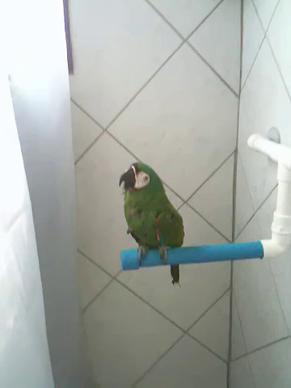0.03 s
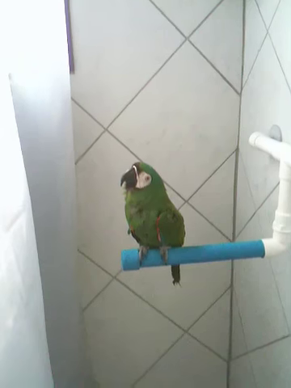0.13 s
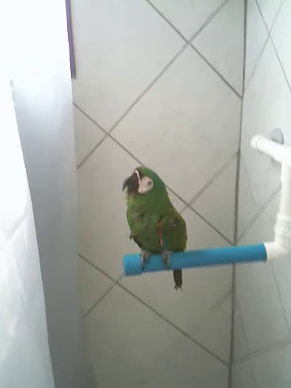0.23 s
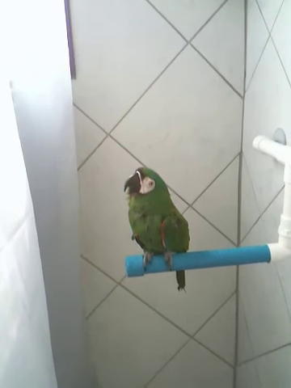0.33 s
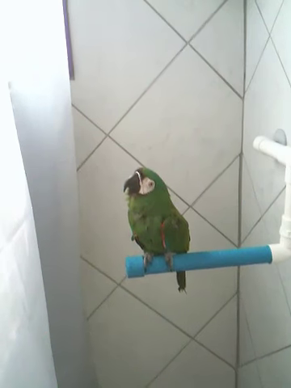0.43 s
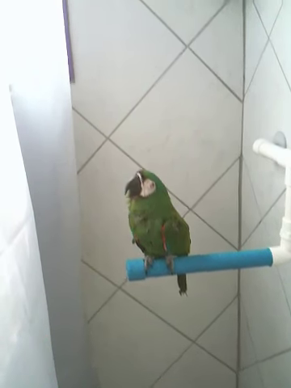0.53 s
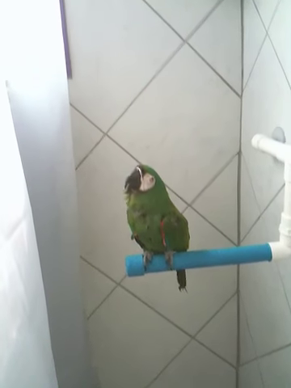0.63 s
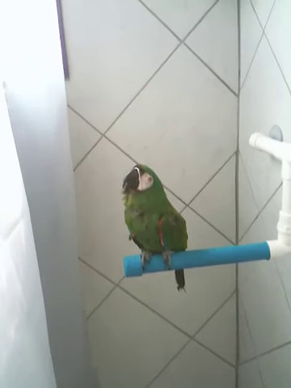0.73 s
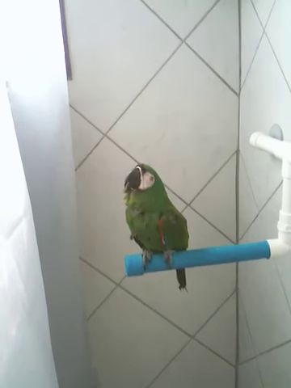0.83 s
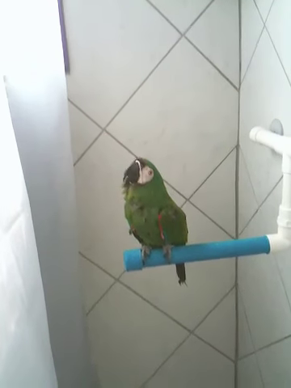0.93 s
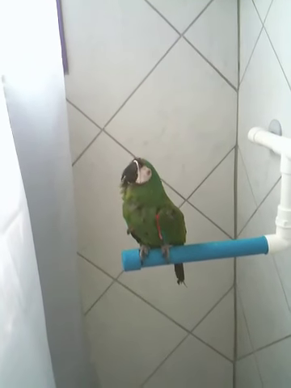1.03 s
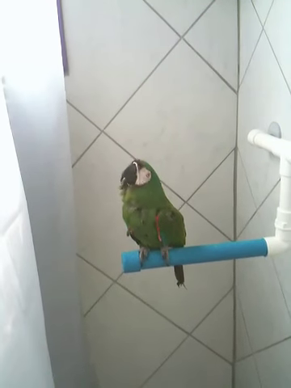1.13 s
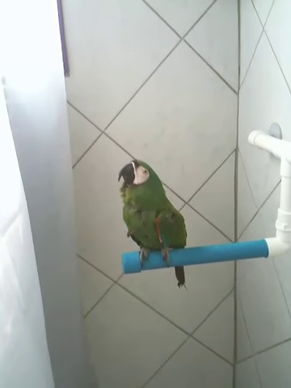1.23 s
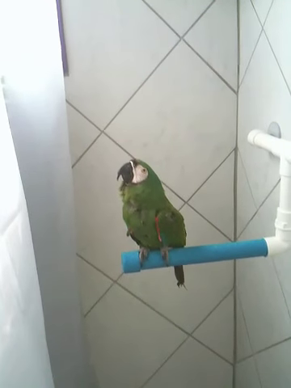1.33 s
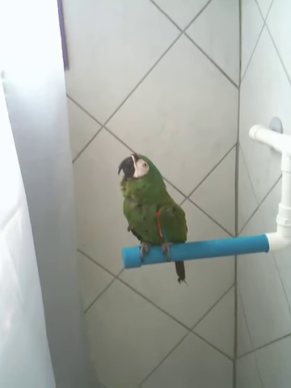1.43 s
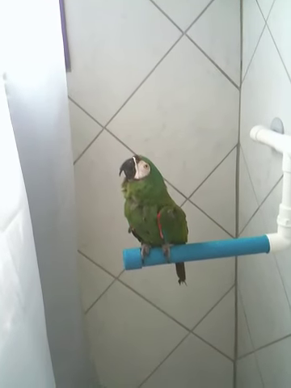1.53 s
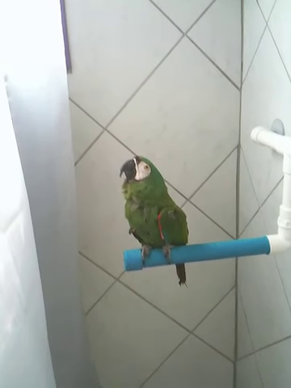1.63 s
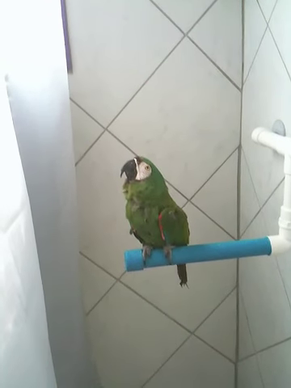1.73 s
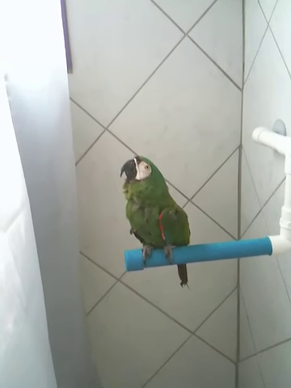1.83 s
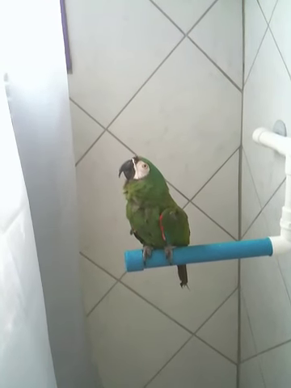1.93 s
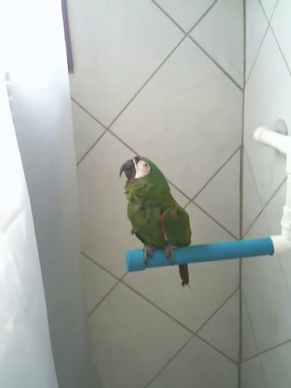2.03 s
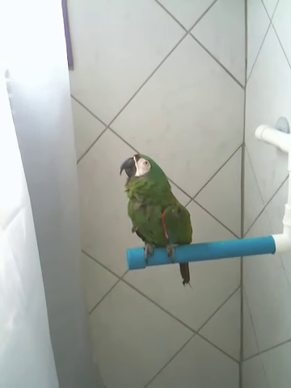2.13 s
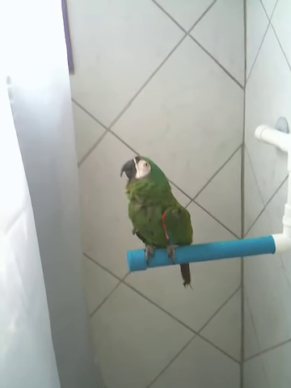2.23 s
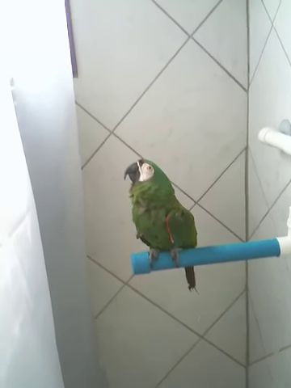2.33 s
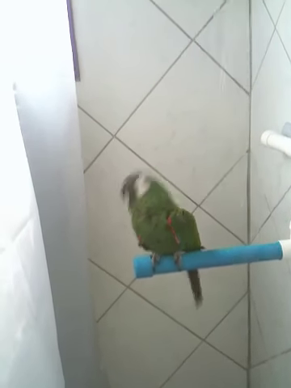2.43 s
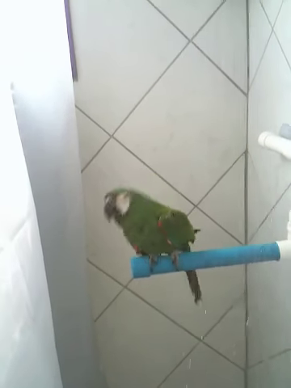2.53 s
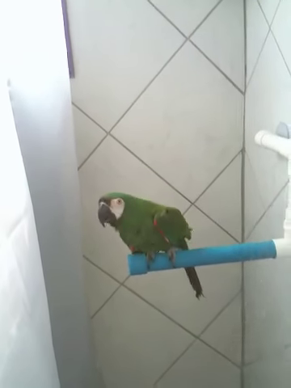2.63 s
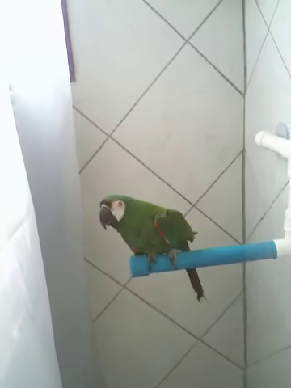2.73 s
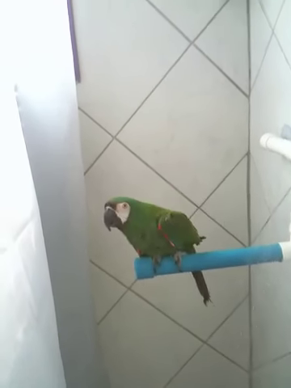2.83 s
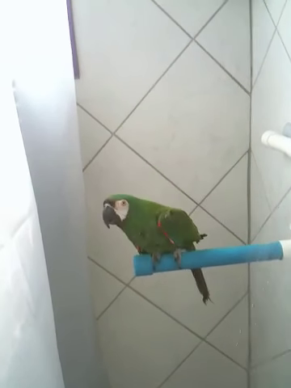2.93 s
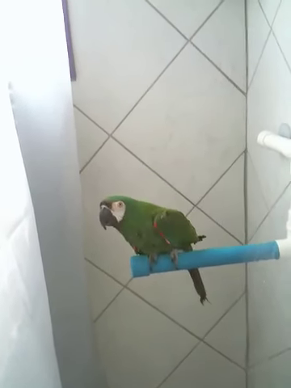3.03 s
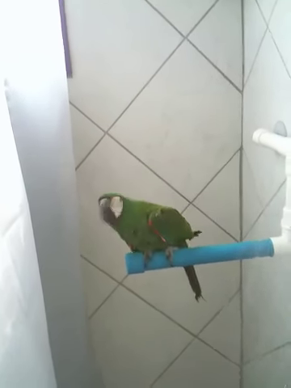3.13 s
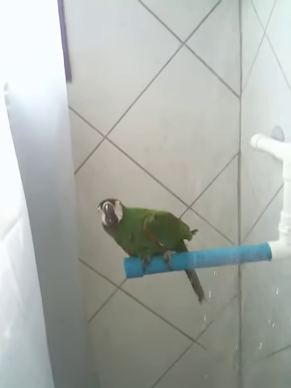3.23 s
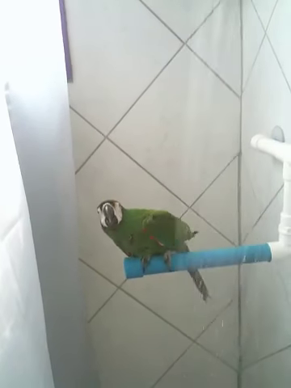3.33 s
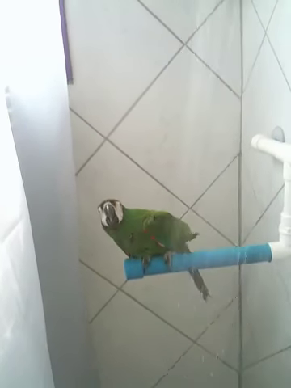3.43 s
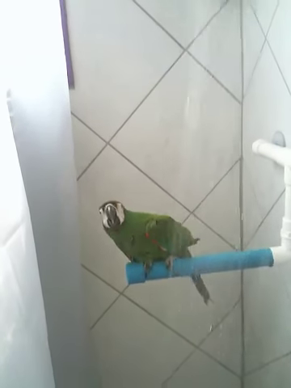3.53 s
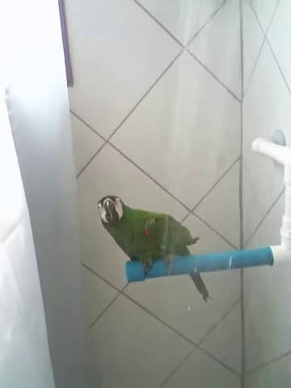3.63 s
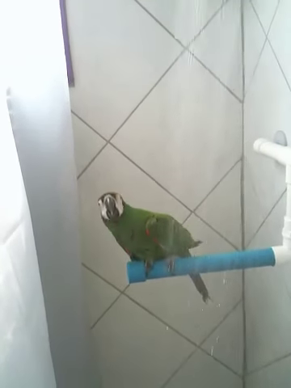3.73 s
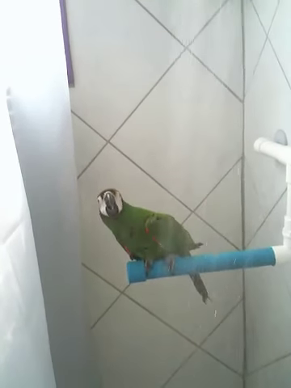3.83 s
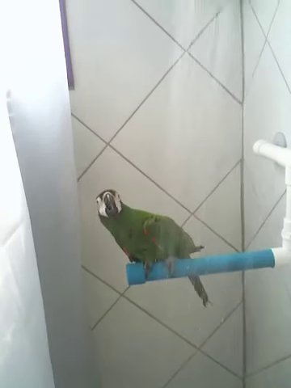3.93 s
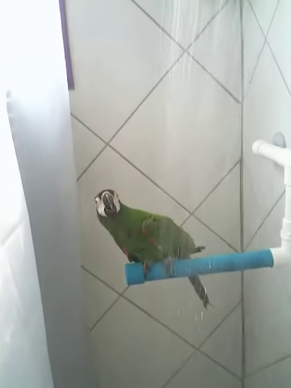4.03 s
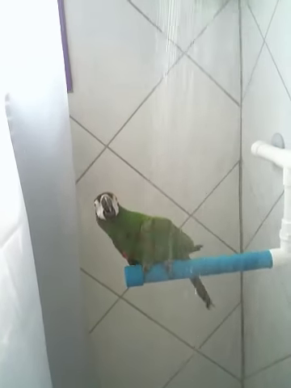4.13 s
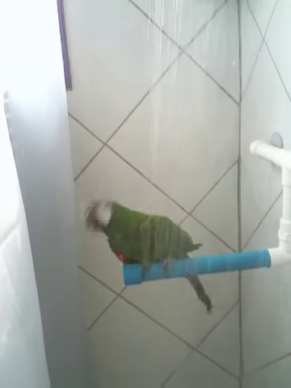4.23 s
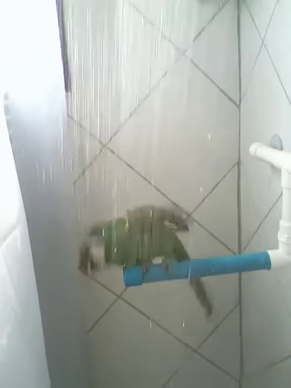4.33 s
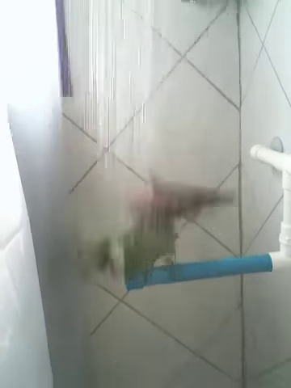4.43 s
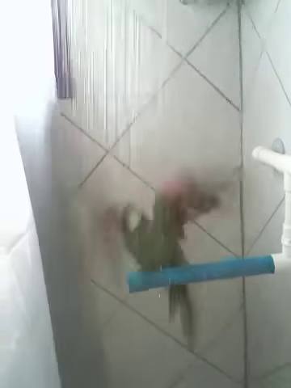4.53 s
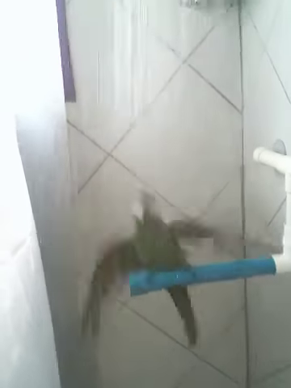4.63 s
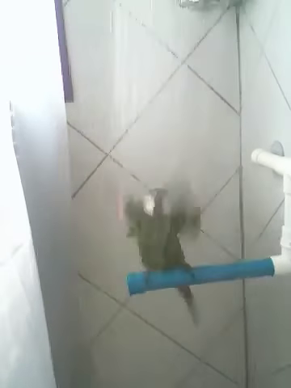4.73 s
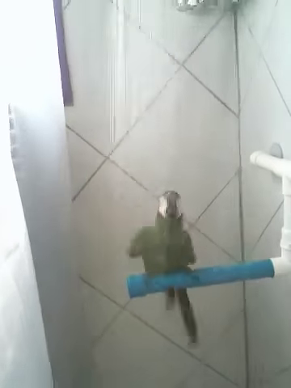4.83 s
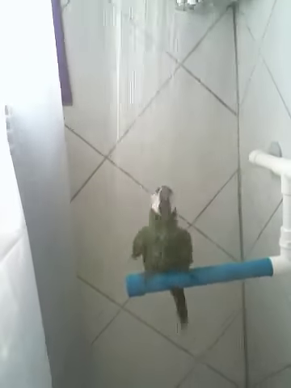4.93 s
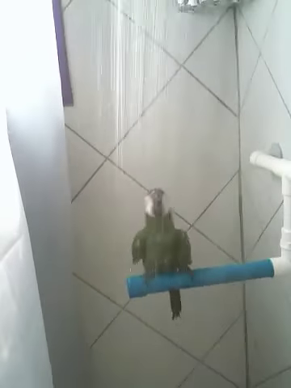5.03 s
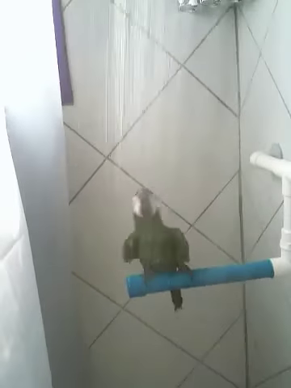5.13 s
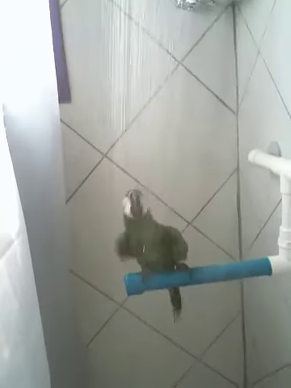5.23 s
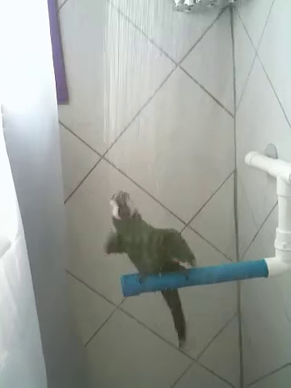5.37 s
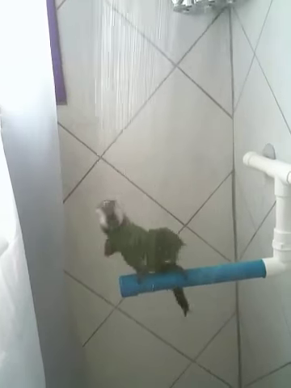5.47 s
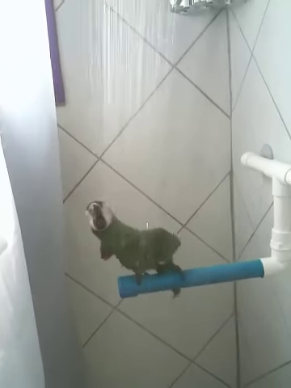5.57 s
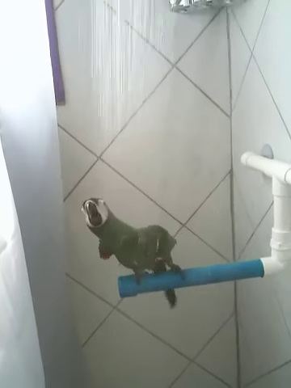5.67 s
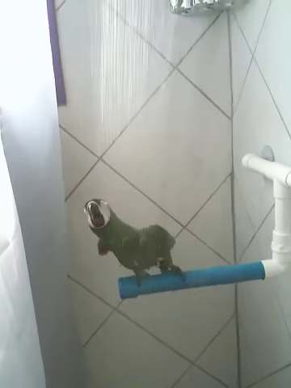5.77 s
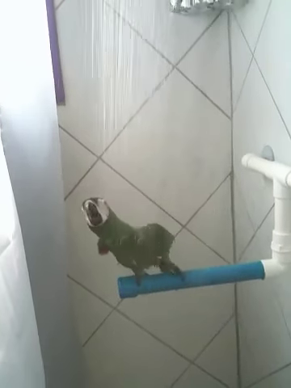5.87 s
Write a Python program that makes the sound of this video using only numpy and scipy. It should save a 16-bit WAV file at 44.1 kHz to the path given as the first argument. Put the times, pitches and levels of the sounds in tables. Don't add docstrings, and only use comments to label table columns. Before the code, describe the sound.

Steady shower spray in a small tiled bathroom, two pairs of hard cracks, drain gurgles, and a bird shaking water from its feathers.

```python
import sys
import numpy as np
from scipy import signal
from scipy.fft import rfft, irfft, next_fast_len
from scipy.io import wavfile
from scipy.ndimage import uniform_filter1d, minimum_filter1d

SR = 44100
rng = np.random.default_rng(int(sys.argv[2]) if len(sys.argv) > 2 else 0)


def magnitude_from_level(level_db):
    exponent = np.asarray(level_db, float) / 20
    return 10 ** exponent


def output_pcm(signal):
    pcm = np.clip(np.atleast_2d(signal).T, -1, 1) * 32767
    wavfile.write(sys.argv[1], SR, np.round(pcm).astype(np.int16))


N = 260190
TIME = np.arange(N) / SR
START_S, TOP_HZ = 0.036, 16000


def rms_one(x):
    return x / np.sqrt(np.mean(x ** 2) + 1e-20)


def at_hz(points, hz):
    table = np.array(points)
    return np.interp(np.log(hz), np.log(table[:, 0]), table[:, 1])


def band_pass(x, order, low_hz, high_hz):
    return signal.sosfilt(signal.butter(order, [low_hz, high_hz], "band", fs=SR, output="sos"), x)


def drift(rate_hz):
    r = np.exp(-40 * np.pi * rate_hz / SR)
    noise = rng.standard_normal(N // 20 + 2002)
    slow = signal.lfilter([1], [1, -2 * r, r * r], noise)[2000:]
    return np.interp(np.arange(N) / 20, np.arange(len(slow)), rms_one(slow))


def ring(x, hz, t60_s):
    r = magnitude_from_level(-60 / (t60_s * SR))
    w = 2 * np.pi * hz / SR
    return signal.lfilter([0, np.sin(w)], [1, -2 * r * np.cos(w), r * r], x + 1e-18)


def dying(start_s, rise_s, t60_s):
    age = np.maximum(TIME - start_s, 0)
    return (1 - np.exp(-age / rise_s)) * magnitude_from_level(np.maximum(-60 * age / t60_s, -120))


def tiles():
    t60_s = 0.25
    tail = rng.standard_normal(SR // 2) * magnitude_from_level(-60 * TIME[:SR // 2] / t60_s)
    return rfft(tail, next_fast_len(N))


def drops(room, per_s, spread_db, blur):
    sizes = magnitude_from_level(spread_db * np.minimum(rng.exponential(1, N), 4)) * rng.choice([-1, 1], N)
    impacts = rms_one(sizes * (rng.random(N) < per_s / SR))
    far = rng.standard_normal((2, next_fast_len(N)))
    coloured = rms_one(irfft(rfft(far[0]) * room, far.shape[1]))
    echoes = coloured + 1.18 * far[1]
    return rms_one(impacts + blur * echoes[:N])


def bands(sources, low_hz, high_hz, gain):
    edges_hz = high_hz / 2 ** np.arange(0, np.log2(high_hz / low_hz) + .01, 1 / 4)
    out = np.zeros(N)
    for k, (high, low) in enumerate(zip(edges_hz, edges_hz[1:])):
        out += gain(np.sqrt(low * high)) * band_pass(sources[k % 2], 2, low, high)
    return out


def water(room, spectrum, low_hz, high_hz, per_s, spread_db, blur, patchy_db):
    together = drift(6.8)

    def flicker(hz):
        return magnitude_from_level(at_hz(spectrum, hz) + patchy_db * (0.51 * together + drift(22.4)))

    sources = [drops(room, per_s, spread_db, blur) for _ in range(2)]
    return rms_one(bands(sources, low_hz, high_hz, flicker))


# (frequency [Hz], density [dB per Hz])
HISS = [(1760, -39), (3000, -9), (4710, -5), (7050, 0.5), (8280, 0.5), (13700, -8), (15200, -10.5),
        (15800, -15)]
# (time [s], water near the microphone [dB], share hitting bird and perch as fat drops [dB])
FLOW = [(0.04, -27.5, -0.5), (0.3, -27, -1.1), (1.3, -26.5, -1.5), (2.1, -26.5, 0.8), (2.54, -25.5, 1),
        (2.69, -27, .6), (2.76, -34.5, -2.5), (2.80, -30.5, -4), (2.83, -27.5, 1.7), (3.34, -26, 1.2),
        (3.45, -28, .6), (4.1, -28.5, 2), (4.47, -28.5, 0), (4.64, -28.5, 1), (4.87, -33.5, 3),
        (4.96, -38.5, 2.5), (5.4, -36, -3), (5.9, -42.5, 4.5)]


def fine_hiss(room):
    time_s, near_db, _ = np.transpose(FLOW)
    spray = water(room, HISS, 3300, TOP_HZ + 600, per_s=3000, spread_db=4.0, blur=1.34, patchy_db=1.17)
    return magnitude_from_level(np.interp(TIME, time_s, near_db)) * spray


# (frequency [Hz], density [dB per Hz])
SPLASH = [(500, -45), (850, -38), (924, -39.5), (1040, -12.5), (1350, -6.5), (1940, -6.5), (4500, -3),
          (5850, -30), (9900, -120)]


def coarse_splash(room):
    lag_s, full_db, full_flow_db, follows = 0.0095, -41, -27, 1.15
    time_s, near_db, fat_db = np.transpose(FLOW)
    level_db = full_db + fat_db + follows * (near_db - full_flow_db)
    splash = water(room, SPLASH, 799, 3503, per_s=830, spread_db=0.5, blur=2.8, patchy_db=1.8)
    return magnitude_from_level(np.interp(TIME - lag_s, time_s, level_db)) * splash


# (frequency [Hz], density [dB per Hz])
RUNOFF = [(60, -28), (110, -53), (150, -1.5), (220, -9.5), (350, 1), (480, -8.5), (700, -3.5), (1000, -6),
          (1400, -11)]


def runoff(room):
    return magnitude_from_level(-52) * water(room, RUNOFF, 60, 1300, per_s=400, spread_db=3.0, blur=1.6, patchy_db=1.5)


# (frequency [Hz], density [dB per Hz])
FAR = [(600, -30), (900, -23), (1400, -4), (2400, -12.5), (3500, -6.5), (5800, -11), (7500, -2.5),
       (12000, -5), (15800, -7.5)]


def far_spray(room):
    return magnitude_from_level(-40) * water(room, FAR, 850, TOP_HZ + 600, per_s=4000, spread_db=3.5, blur=2.0, patchy_db=1.6)


def drain_tone(hz, width_hz):
    t60_s = 1.55 / width_hz
    tone = rms_one(ring(ring(rng.standard_normal(N), hz, t60_s), hz, t60_s))
    power = uniform_filter1d(tone ** 2, size=1500)
    return rms_one(tone / (power + 0.28) ** 0.35)


def gulps(rows):
    attack_s, t60_s, trickle_db = 0.0048, 0.16, -62
    level = magnitude_from_level(trickle_db)
    for start_s, hold_s, db in rows:
        swell = 1 - np.exp(-np.maximum(TIME - start_s, 0) / attack_s)
        decay = magnitude_from_level(-60 * np.clip(TIME - start_s - hold_s, 0, 1) / t60_s)
        level = level + magnitude_from_level(db) * swell * decay
    return level


# (frequency [Hz], width [Hz])
DRAIN = [(293, 14.6), (738, 40.5)]
# (time [s], hold [s], level [dB])
LOW_GULPS = [(0.035, .26, -49.5), (0.373, 0.057, -46.5), (0.52, 0.047, -48), (0.67, 0.093, -51.5),
             (0.924, 0.11, -53.5), (1.183, 0.037, -46), (1.452, .1, -62), (1.643, 0.15, -53),
             (1.997, .15, -51.5), (2.38, 0.079, -55), (2.585, 0.059, -52), (2.9, 0.12, -60),
             (3.245, 0.068, -58), (3.437, 0.036, -55), (3.545, 0.048, -51.5), (3.73, .07, -56),
             (3.898, 0.058, -53), (4.143, 0.045, -47), (4.706, .04, -57), (4.88, .07, -58),
             (5.033, 0.032, -56), (5.225, 0.041, -63), (5.47, 0.057, -60), (5.83, 0.046, -56)]
# (time [s], hold [s], level [dB])
HIGH_GULPS = [(0.04, 0.22, -48.5), (0.31, 0.036, -52.5), (0.44, 0.032, -58), (0.52, 0.046, -53),
              (0.67, 0.018, -40), (0.77, 0.064, -53), (0.87, 0.16, -56), (1.37, 0.032, -58),
              (1.61, 0.038, -55), (1.8, .09, -52), (2.15, .05, -49), (2.5, 0.031, -60), (2.63, .04, -54),
              (2.74, 0.048, -49.5), (2.96, .05, -51), (3.17, 0.057, -56), (3.44, 0.023, -51),
              (3.56, .05, -57), (4.04, .06, -48.5), (4.78, 0.14, -52), (4.97, 0.03, -50),
              (5.06, 0.084, -48), (5.22, 0.034, -49), (5.4, 0.12, -56.5), (5.669, 0.043, -42.5),
              (5.76, 0.05, -45)]


def drain():
    return sum(gulps(rows) * drain_tone(hz, width_hz)
               for (hz, width_hz), rows in zip(DRAIN, [LOW_GULPS, HIGH_GULPS]))


# (frequency [Hz], level [dB], t60 [s])
ROOM_MODES = [(140.8, 3.5, 0.25), (178.6, -14, 0.53), (291.3, -1.5, 0.22), (363, -24, .25),
              (457, -8.5, 0.26), (881, -3, 0.31), (1170, -14, 0.18), (1340, 4.5, 0.2), (1560, -2, 0.18),
              (996, -8, 0.39)]


def room_hum():
    stir = rng.standard_normal(N)
    return magnitude_from_level(-67) * rms_one(sum(magnitude_from_level(db) * ring(stir, hz, t60_s) for hz, db, t60_s in ROOM_MODES[:2]))


KNOCK_S = [2.2074, 2.2441, 4.0957, 4.3335]
# (crack level [dB], crack ring [Hz], echo level [dB], boom level [dB])
KNOCKS = [(-2, 6060, -16.5, -36.5), (0, 6550, -16.5, -30), (-3.5, 6210, -17, -32), (-2.5, 6420, -17, -31.5)]
# (delay [s], level [dB])
NEAR_TILES = [(0, 1.5), (.0028, -5), (.0063, -24), (.0098, -40), (.017, -15), (0.025, -19)]


def knock_cracks():
    out = np.zeros(N)
    fade = np.exp(-(TIME[:400] / .0021) ** 3)
    for s, (crack_db, hz, *_) in zip(KNOCK_S, KNOCKS):
        for delay_s, db in NEAR_TILES:
            noise = rng.standard_normal(800)
            ringing = rms_one(ring(noise, hz, 0.0043)[400:])
            ringing = ringing + 0.53 * rms_one(ring(noise, 1.32 * hz, 0.0036)[400:])
            at = round((s + delay_s) * SR)
            out[at:at + 400] += magnitude_from_level(crack_db + db - 3) * np.tanh(2 * ringing) * fade
    return out


# (frequency [Hz], density [dB per Hz])
ECHO = [(88, -29), (150, -18), (205, -6.5), (466, -11), (662, -19), (1450, -0.5), (1980, -2.5), (3290, -6),
        (6260, 1.5), (12900, -6), (16000, -91)]
# (frequency [Hz], t60 [s])
ECHO_T60 = [(150, 0.32), (700, 0.51), (2000, 0.23), (5000, 0.36), (13000, 0.2)]


def knock_echoes(room):
    tilt_db_per_octave = -0.57

    def cloud(hz):
        shift_db = 7.5 + tilt_db_per_octave * np.log2(hz / 4000)
        t60_s = at_hz(ECHO_T60, hz)
        decays = sum(magnitude_from_level(echo_db + shift_db) * dying(s, 0.0014, t60_s)
                     for s, (_, _, echo_db, _) in zip(KNOCK_S, KNOCKS))
        return magnitude_from_level(at_hz(ECHO, hz)) * decays

    return bands([drops(room, 2500, 4.5, .8) for _ in range(2)], 150, TOP_HZ + 600, cloud)


def knock_booms():
    swell_s = 0.034
    out = np.zeros(N)
    for k, (hz, db, t60_s) in enumerate(ROOM_MODES):
        blows = np.zeros(N)
        for s, (*_, boom_db) in zip(KNOCK_S, KNOCKS):
            blows[round(s * SR)] = magnitude_from_level(boom_db + db) * (-1) ** k
        out += ring(ring(blows, hz, t60_s), hz, swell_s) * 2 * np.log(1000) / (swell_s * SR)
    return out


SHAKE_RISE_S = 0.0062
# (time [s], level [dB], centre [Hz], t60 [s])
SHAKES = [(2.772, -28, 8100, 0.48), (3.052, -21.5, 8100, .11), (4.45, -36, 8400, .6),
          (4.475, -32, 8540, 0.38), (4.497, -22, 8800, 0.21), (4.53, -40, 8850, .5), (4.66, -48, 8000, .25),
          (4.715, -45, 7000, .35), (4.74, -32, 7400, .28), (5.05, -40.5, 6600, 0.42),
          (5.09, -45, 5530, .27), (5.15, -31.5, 6500, .11), (5.265, -30, 8450, .091),
          (5.31, -37, 8000, 0.075), (5.333, -34.5, 7150, 0.32), (5.405, -34, 9000, .22),
          (5.541, -34.5, 6960, 0.22), (5.622, -36, 8100, .19), (5.66, -41, 7000, 0.33),
          (5.694, -31.5, 7580, 0.35), (5.74, -39.5, 5360, 0.29), (5.8, -41, 9050, .16)]


def shake_puffs(room):
    fall_db = 29

    def puff(hz):
        return sum(magnitude_from_level(db + 11 - fall_db * np.log2(hz / centre_hz) ** 2) * dying(s, SHAKE_RISE_S, t60_s)
                   for s, db, centre_hz, t60_s in SHAKES)

    return bands([drops(room, 2500, 4.0, 1.1) for _ in range(2)], 2500, TOP_HZ + 600, puff)


# (time [s], level [dB])
WING_BEATS = [(4.49, -41), (4.5, -35), (4.53, -50), (4.583, -50), (4.605, -52), (4.66, -45), (4.715, -43.5)]


def body_thuds(room):
    thud_db, beat_t60_s = -26.5, 0.33
    thud = rms_one(band_pass(drops(room, 540, 1.7, 1.0), 2, 90, 1500))
    push = sum(magnitude_from_level(db + thud_db) * dying(s, SHAKE_RISE_S, t60_s) for s, db, _, t60_s in SHAKES)
    push = push + sum(magnitude_from_level(db) * dying(s, SHAKE_RISE_S, beat_t60_s) for s, db in WING_BEATS)
    return thud * push


# (time [s], level [dB], frequency [Hz], t60 [s])
PLOPS = [
    (4.692, -30, 890, 0.065),
    (4.714, -31.5, 418, 0.04),
]


def plops():
    return sum(magnitude_from_level(db) * dying(s, 0.001, t60_s) * np.sin(2 * np.pi * hz * (TIME - s))
               for s, db, hz, t60_s in PLOPS)


def scene():
    room = tiles()
    shower = fine_hiss(room) + coarse_splash(room) + runoff(room) + far_spray(room) + drain() + room_hum()
    knocks = knock_cracks() + knock_echoes(room) + knock_booms()
    bird = shake_puffs(room) + body_thuds(room) + plops()
    return np.tile(shower + knocks + bird, (2, 1))


def drop_weak_lines(x):
    weak_db, swing_db, from_hz = -11, 1.5, 11000
    window = signal.windows.cosine(2048)
    hz, _, z = signal.stft(x, SR, window, 2048, 1024)
    main = (hz > 6000) & (hz < 10000)
    hiss = minimum_filter1d(np.sqrt(np.mean(np.abs(z[0, main]) ** 2, axis=0)), size=3)
    limit = hiss * magnitude_from_level(weak_db + swing_db * rng.standard_normal(len(hiss)))
    kept = (uniform_filter1d(np.abs(z), size=3, axis=1) > limit) | (hz < from_hz)[:, None]
    return signal.istft(z * kept, SR, window, 2048, 1024)[1][:, :N] * (TIME > START_S)


# (from [s], to [s], level [dB])
STARVED = [
    (4.0885, 4.0945, -9),
    (4.3205, 4.3325, -22),
]


def starve(x):
    kept = signal.sosfiltfilt(signal.butter(3, [5000, 12000], "band", fs=SR, output="sos"), x)
    loss = sum((1 - magnitude_from_level(db)) * ((TIME > start_s) & (TIME < end_s)) for start_s, end_s, db in STARVED)
    return x - uniform_filter1d(loss, size=60) * (x - kept)


# (time [s], centre [Hz])
FILLED = [(0.346, 13800), (0.346, 6270), (0.346, 8270), (0.624, 4720), (0.624, 5790), (1.047, 5470),
          (1.092, 4700), (1.208, 5170), (1.392, 7580), (2.045, 4950), (2.996, 6940), (3.206, 10310),
          (3.297, 10340), (3.297, 11710), (3.53, 11050), (3.53, 11750), (3.53, 6910), (3.784, 5750),
          (3.784, 12380), (4.201, 11030), (4.27, 8960), (4.786, 5170), (5.388, 5730), (5.388, 11030),
          (5.388, 13760), (5.828, 5750)]


def noise_fill(x):
    width_share, widest_hz, fill_db = 0.2, 1360, 0.5
    side = np.zeros(N)
    hz = np.arange(1025) * SR / 2048
    window = signal.windows.kaiser(2048, 9)
    for s, centre_hz in FILLED:
        band = np.abs(hz - centre_hz) < min(width_share * centre_hz, widest_hz) / 2
        at = round(s * SR / 1024) * 1024 - 1024
        level = np.std(irfft(rfft(x[at:at + 2048]) * band))
        noise = rms_one(irfft(rfft(rng.standard_normal(2048)) * band))
        side[at:at + 2048] += magnitude_from_level(fill_db) * level * noise * window
    return side * [[1], [-1]]


def roll_off(x):
    return signal.sosfilt(signal.butter(12, 16820, fs=SR, output="sos"), x)


def record(dry):
    overload = 0.6
    x = signal.sosfilt(signal.butter(3, 105, "high", fs=SR, output="sos"), dry) * (TIME > START_S)
    x = x / (1 + np.abs(x / overload) ** 6) ** (1 / 6)
    x = signal.sosfilt(signal.cheby2(16, 60, TOP_HZ + 250, fs=SR, output="sos"), x)
    x = starve(drop_weak_lines(x))
    mix = x + noise_fill(x[0])
    return roll_off(mix)


dry = scene()
out = record(dry)
output_pcm(out)
```